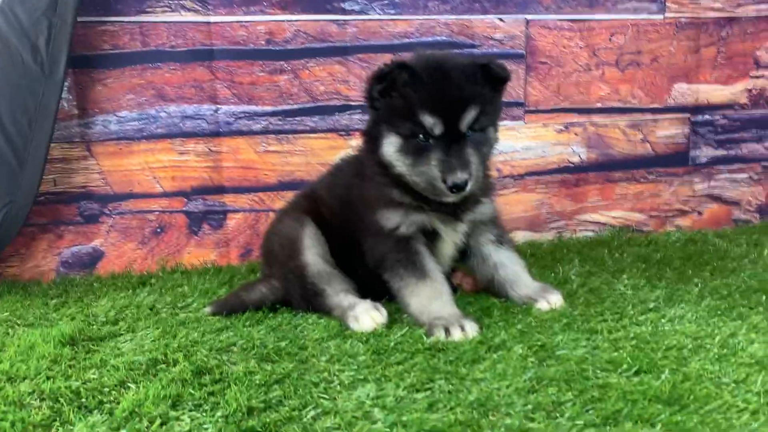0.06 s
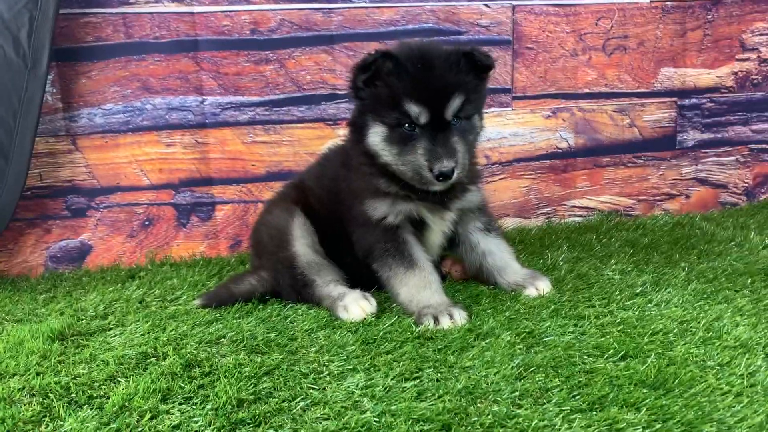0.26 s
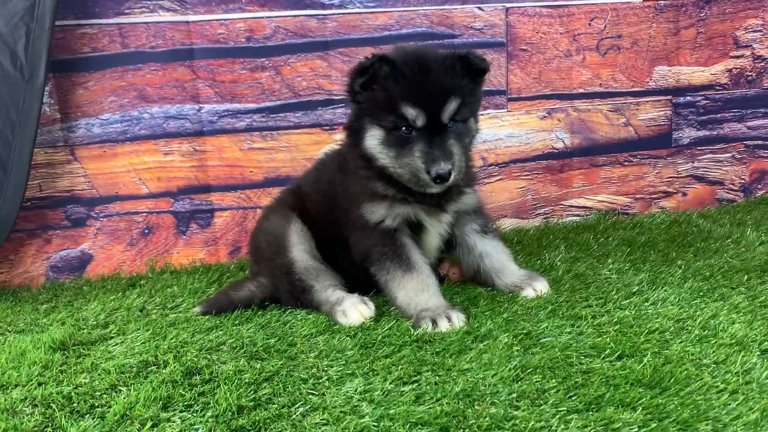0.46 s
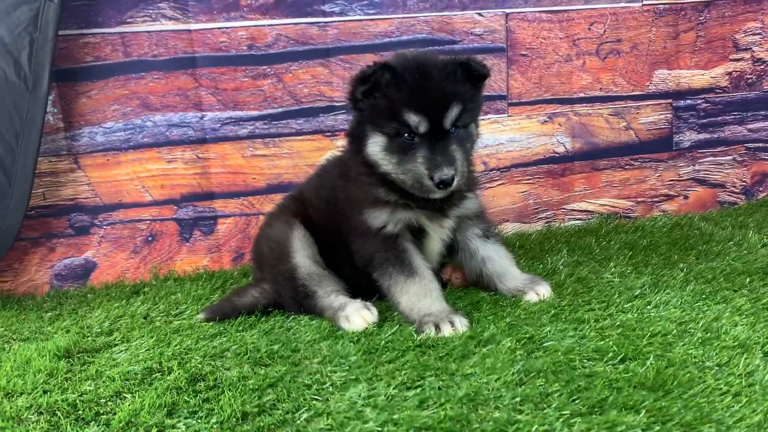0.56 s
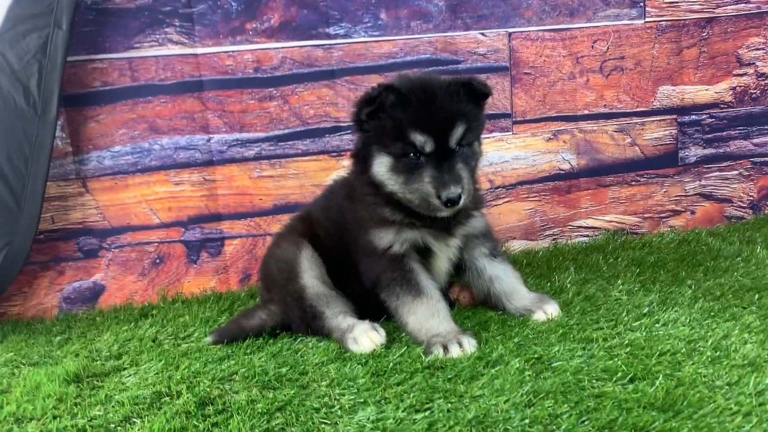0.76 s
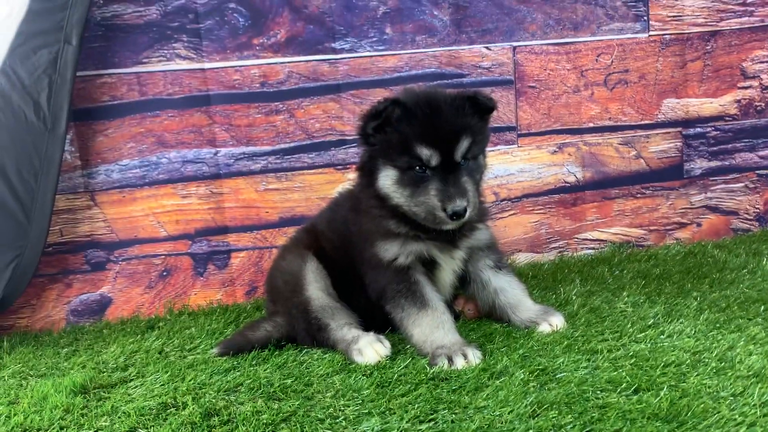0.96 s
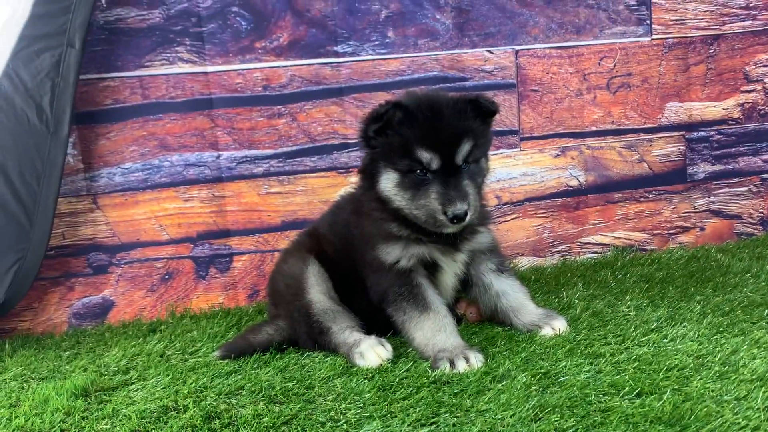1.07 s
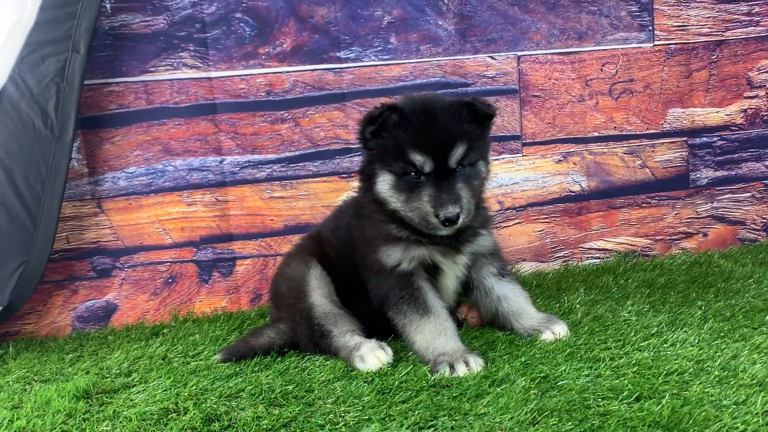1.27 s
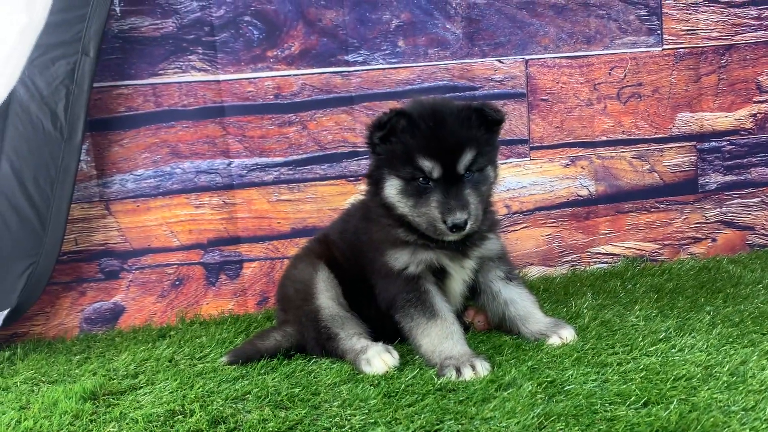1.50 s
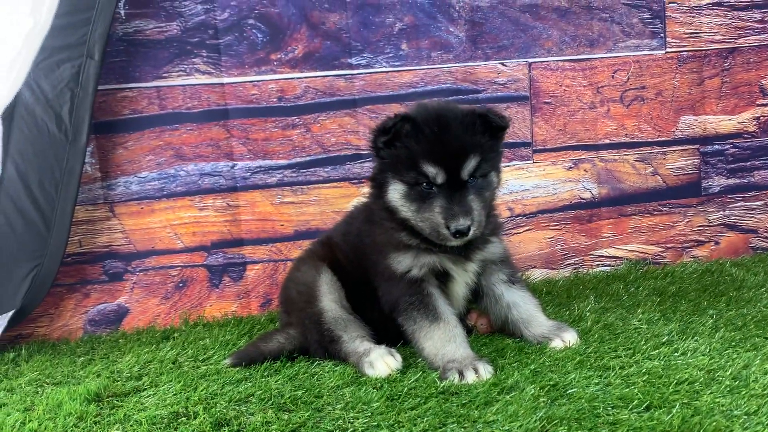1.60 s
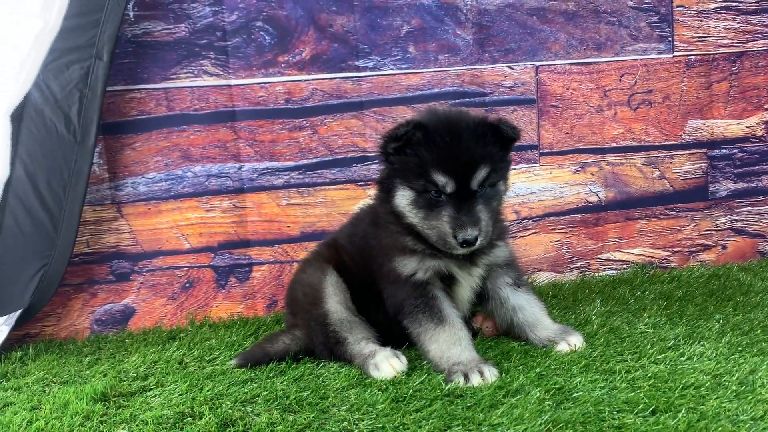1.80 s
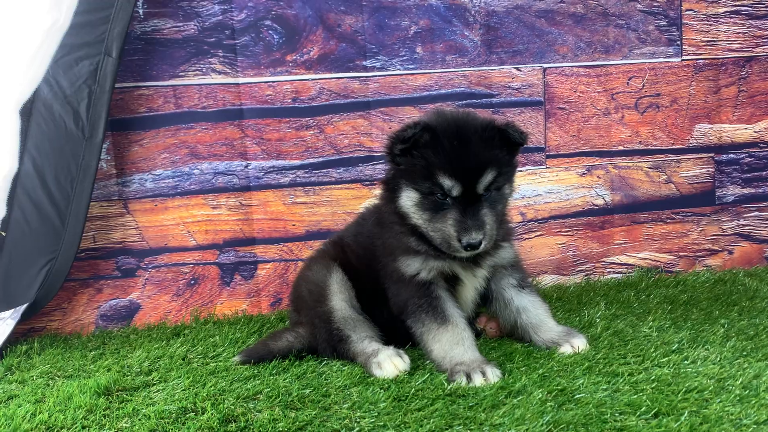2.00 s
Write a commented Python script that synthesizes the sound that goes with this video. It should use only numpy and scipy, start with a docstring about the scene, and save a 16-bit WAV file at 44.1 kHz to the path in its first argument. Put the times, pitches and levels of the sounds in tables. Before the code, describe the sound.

A small puppy lets out three brief, piercing whimpers and one faint lower one within the first second, in a small lightly echoing room; then a soft bump, a faint rustle and low hum, heard close in stereo.

```python
"""Husky puppy whimpers in a small room

Three short, shrill whimpers and one faint low one: harmonics on an arch of pitch, strong near 7 kHz.
Each opens with a puff of coloured noise. Soft bumps are low-passed scuffs over low thuds.
Early reflections and a diffuse tail smear the voice and bumps; brief noise rustles and a low hum stay dry.
"""
import sys
import numpy as np
from scipy import signal
from scipy.fft import rfft, irfft
from scipy.io import wavfile
from scipy.ndimage import uniform_filter1d

SR = 44100
rng = np.random.default_rng(int(sys.argv[2]) if len(sys.argv) > 2 else 0)


def to_wav(sig):
    """Store sig (one row per channel, or 1-D mono) as 16-bit WAV at the path in sys.argv[1].

    Samples outside -1..1 are clipped; the rate is SR.
    """
    pcm = np.clip(np.atleast_2d(sig), -1, 1) * 32767
    pcm = np.round(pcm).astype(np.int16)
    wavfile.write(sys.argv[1], SR, pcm.T)  # frames by channels


N = 90404
T = np.arange(N) / SR

# Whimpers: start_s, top_s, end_s, top_pitch_hz, slack_pitch_hz, overtones_db, fundamental_db,
# hold_s, fade_db_per_s, air_db (relative to the overtones)
WHIMPERS = [(0.208, 0.263, 0.31, 1397, 991.7, -20.5, -29, 0.041, 289.5, -19),
            (0.392, 0.398, .44, 887, 770, -37.5, -40.5, 0.016, 380.5, -27),
            (0.584, 0.624, .686, 1145, 1015, -21, -32.5, 0.006, 298.5, -22.5),
            (0.944, 0.998, 1.068, 1365, 1015, -20.5, -29.5, .034, 311.5, -15.5)]
# Throat and nose resonance: freq_hz, relative_db
THROAT_COLOUR = [(1700, 0.5), (2300, -12.5), (2750, -8.5), (3100, -15), (3500, -11.5), (4300, -10.5),
                 (5500, -7.5), (6300, -0.5), (6900, 2), (7500, -3.5), (8150, -3.5), (9200, -10.5),
                 (11000, -10.5), (12200, -53.5), (13000, -3.5), (14300, -19), (15200, -42.5)]
# Spectrum of the opening puff: freq_hz, relative_db
PUFF_COLOUR = [(120, -6.5), (220, 3.5), (550, -8), (900, 4), (1600, -14.5), (2200, 7), (3000, -17.5),
               (4500, -7.5), (7000, 2.5), (10000, -17.5), (15000, -11)]
# Soft contacts: start_s, scuff_db (before low-pass), thud_db, scuff_decay_s, scuff_cutoff_hz
BUMPS = [(.178, -57.5, -46.5, 0.042, 2370), (0.409, -48, -49, .018, 3010),
         (0.863, -46.5, -46.5, .012, 4530), (1.309, -37, -43, 0.0091, 11040)]
# Spectrum of the scuffs: freq_hz, relative_db
SCUFF_COLOUR = [(150, -8), (280, -2), (420, 7), (580, -6), (850, -2.5), (1100, -18), (1700, -18.5),
                (3500, -19), (7000, -28), (10000, -23), (14000, -34)]
# Spectrum of the thuds: freq_hz, relative_db
THUD_COLOUR = [(50, -13), (110, 3.5), (220, 2.5), (330, -8), (600, -22), (1200, -44.5)]
# Rustles: start_s, length_s, level_db
RUSTLES = [(1.192, 0.087, -64.5), (1.979, .12, -52.5)]
# Spectrum of the rustles: freq_hz, relative_db
RUSTLE_COLOUR = [(240, -9.5), (450, -5.5), (750, -15), (1400, -6), (1900, -4), (2400, -12), (2950, -22.5),
                 (3500, -10.5), (4300, -12), (5200, -21), (6600, -26.5), (8700, -21.5), (11900, -27),
                 (13300, -22), (15000, -46)]
# Reverberation time by band: freq_hz, t60_s
ROOM_T60 = [(200, 1), (1200, 0.25), (3000, 0.31), (7000, 0.29), (10000, 0.29), (14000, .26)]
# Spectrum of the reflected sound: freq_hz, gain_db
ROOM_COLOUR = [(100, -8.5), (400, -5), (1100, 0.5), (2500, 6.5), (4000, 3.5), (7000, 6.5), (14000, -3)]
# Stereo balance: freq_hz, left_minus_right_db
PAN = [(300, -1), (800, -5.5), (1300, 5), (2800, 2), (5000, 0), (8000, -3), (13000, 0.5)]
# Spectrum of the quiet room noise: freq_hz, relative_db
FLOOR_COLOUR = [(20, -36.5), (35, -28.5), (55, 10.5), (80, -11.5), (150, -13), (250, -17.5), (350, -29.5),
                (450, -20), (600, -31.5), (1400, -37), (2700, -48.5), (15000, -66)]

PITCH_RISE_S, PITCH_FALL_S = 0.037, 0.041  # widths of the two sides of the arch
ARCH_POWER = 2.3  # above 2 flattens the top
SAG_HZ_PER_S, SAG_AFTER_S = 2000, 0.025  # extra pitch fall, counted from the top
ATTACK_S, RELEASE_S = 0.0098, 0.0045
SWELL_DB_PER_S = 322.5  # growth towards the hold
JITTER_RATIO, JITTER_RATE_HZ = 0.005, 1100
CATCH_JITTER_RATIO, CATCH_DECAY_S = 0.025, 0.0068  # extra at the start
SLACK_JITTER_RATIO = 0.018  # extra as the pitch leaves the top
SHIMMER_DB, SHIMMER_RATE_HZ = 2.2, 200
OVERTONE_FADE_RATIO = 1.325  # overtone fade rate over that of the fundamental
PUFF_DB, PUFF_DECAY_S = -37.5, 0.02  # level for the loudest whimper, before the envelope
SCUFF_RISE_S = 0.003
THUD_RISE_S, THUD_DECAY_S = 0.027, 0.016
RUSTLE_RISE_S = 0.024
LEFT_LAG_S = 0.00003
EARLY_DB, EARLY_SPAN_S = -3, 0.04  # levels before ROOM_COLOUR
TAIL_DB, TAIL_GAP_S = -8.5, 0.0043
HUM_HZ, HUM_DB, HUM_WAVER_DB = 53, -56, 5.5
FLOOR_DB = -52.5
TOP_HZ = 15300


def undb(db):
    """Decibels to gain."""
    return 10 ** (np.asarray(db) / 20)


def at_hz(points, hz):
    """Interpolate (freq_hz, value) points on a log-frequency axis."""
    p = np.array(points, float)
    return np.interp(np.log(np.maximum(hz, 1)), np.log(p[:, 0]), p[:, 1])


def noise(colour, side=1):
    """Coloured stereo noise of unit level; the side signal vanishes towards the bass."""
    hz = np.arange(N // 2 + 1) * SR / N
    mid, diff = rfft(rng.standard_normal((2, N))) * undb(at_hz(colour, hz))
    diff = diff * side * hz / (hz + 350)
    y = irfft(np.array([mid + diff, mid - diff]), N)
    return y / y.std()


def walk(rate_hz):
    """Smoothed random signal of unit spread."""
    width = max(int(SR / rate_hz), 1)
    y = uniform_filter1d(uniform_filter1d(rng.standard_normal(N), width), width)
    return y / y.std()


def whimper(start, top, end, top_hz, slack_hz, overtones_db, fundamental_db, hold, fade, air_db):
    """Throat-coloured harmonics on one arch of pitch: a rough catch, a swell, a hold and a fade."""
    span = (T > start) & (T < end + RELEASE_S)
    t = T[span]
    attack = np.clip((t - start) / ATTACK_S, 0, 1) ** 2
    release = np.clip((end + RELEASE_S - t) / RELEASE_S, 0, 1)
    before_hold = np.maximum(top - hold / 2 - t, 0)
    after_hold = np.maximum(t - top - hold / 2, 0)
    effort = undb(-SWELL_DB_PER_S * before_hold - fade * after_hold)

    width = np.where(t < top, PITCH_RISE_S, PITCH_FALL_S)
    arch = np.exp(-(np.abs(t - top) / width) ** ARCH_POWER)
    jitter = JITTER_RATIO + CATCH_JITTER_RATIO * np.exp(-(t - start) / CATCH_DECAY_S)
    jitter = jitter + SLACK_JITTER_RATIO * (t > top) * (1 - arch)
    sag = SAG_HZ_PER_S * np.maximum(t - top - SAG_AFTER_S, 0)
    hz = slack_hz + (top_hz - slack_hz) * arch - sag
    hz = hz * (1 + jitter * walk(JITTER_RATE_HZ)[span])
    phase = 2 * np.pi * np.cumsum(hz) / SR

    k = np.arange(2, 17)[:, None]  # overtone numbers
    gains = undb(at_hz(THROAT_COLOUR, k * hz)) * (k * hz < SR / 2)
    gains = gains / np.sqrt((gains ** 2).sum(0).mean() / 2)  # unit RMS sum
    shimmer = undb(SHIMMER_DB * np.array([walk(SHIMMER_RATE_HZ)[span] for _ in k]))
    # breath keeps the throat colour from 4.3 kHz up
    air = noise([(1500, -45), (3200, -25)] + THROAT_COLOUR[5:])[0, span] * undb(air_db)
    overtones = (gains * shimmer * np.sin(k * phase)).sum(0) + air
    extra_fade = np.where(t > top, effort ** (OVERTONE_FADE_RATIO - 1), 1)
    overtones = overtones * undb(overtones_db) * extra_fade
    fundamental = np.sqrt(2) * np.sin(phase) * undb(fundamental_db)
    out = np.zeros(N)
    out[span] = attack * release * effort * (overtones + fundamental)
    return out


def puffs():
    """Escaping air opens each whimper, scaled by its overtone level."""
    loudest_db, envelope = max(row[5] for row in WHIMPERS), 0
    for start, _, _, _, _, db, *_ in WHIMPERS:
        age = np.maximum(T - start, 0)
        shape = np.minimum(age / ATTACK_S, 1) ** 2 * np.exp(-age / PUFF_DECAY_S)
        envelope = envelope + undb(db - loudest_db + PUFF_DB) * shape
    return noise(PUFF_COLOUR)[0] * envelope


def bumps():
    """Each soft contact gives a short scuff, dull or bright, and a slower low thud."""
    scuff, thud, out = noise(SCUFF_COLOUR)[0], noise(THUD_COLOUR)[0], 0
    for start, scuff_db, thud_db, decay, cutoff_hz in BUMPS:
        age = np.maximum(T - start, 0)
        dulled = signal.sosfilt(signal.butter(2, cutoff_hz, fs=SR, output="sos"), scuff)
        scuff_shape = np.minimum(age / SCUFF_RISE_S, 1) * np.exp(-age / decay)
        thud_fall = np.exp(-np.maximum(age - THUD_RISE_S, 0) / THUD_DECAY_S)
        thud_shape = np.minimum(age / THUD_RISE_S, 1) * thud_fall
        out = out + dulled * undb(scuff_db) * scuff_shape + thud * undb(thud_db) * thud_shape
    return out


def direct(size=8):
    """Direct path: one band-limited impulse per ear, the left slightly later."""
    lag = np.array([[LEFT_LAG_S], [0]]) * SR
    return np.sinc(np.arange(N) - size - lag) * (np.arange(N) <= 2 * size + 1)


def early_reflections(count=40):
    """Scattered impulses of random sign, weaker with delay, drawn separately for each ear."""
    early = np.zeros((2, N))
    for ear in early:
        when = (np.arange(count) + rng.random(count)) / count
        index = ((0.001 + when * EARLY_SPAN_S) * SR).astype(int)
        ear[index] = rng.choice([-1, 1], count) * np.exp(-1.5 * when)
    return early


def diffuse_tail():
    """Noise split into bands, each decaying 60 dB in its own T60."""
    hz = np.arange(N // 2 + 1) * SR / N
    white = rfft(rng.standard_normal((2, N)))
    tail = 0
    for i, (_, t60) in enumerate(ROOM_T60):
        share = at_hz([(f, i == j) for j, (f, _) in enumerate(ROOM_T60)], hz)
        tail = tail + irfft(white * share, N) * np.exp(-np.log(1000) * T / t60)
    return tail * np.clip(T / TAIL_GAP_S - 1, 0, 1)


def unit_energy(response):
    """Scale each ear's response to unit energy."""
    return response / np.sqrt((response ** 2).sum(1, keepdims=True))


def room(x):
    """Convolve with direct path, early reflections and tail, then tilt the stereo balance."""
    hz = np.arange(N // 2 + 1) * SR / N
    tail = unit_energy(diffuse_tail()) * undb(TAIL_DB)
    early = unit_energy(early_reflections()) * undb(EARLY_DB)
    reflected = irfft(rfft(tail + early) * undb(at_hz(ROOM_COLOUR, hz)), N)
    heard = signal.fftconvolve(x[None], reflected + direct(), axes=1)[:, :N]
    balance_db = np.array([[1], [-1]]) * at_hz(PAN, hz) / 2
    return irfft(rfft(heard) * undb(balance_db), N)


def rustle():
    """Coloured noise swells and sinks in brief rustles."""
    envelope = 0
    for start, length, db in RUSTLES:
        nearest_edge = np.minimum(T - start, start + length - T)
        envelope = envelope + undb(db) * np.clip(nearest_edge / RUSTLE_RISE_S, 0, 1)
    return noise(RUSTLE_COLOUR) * envelope


def background():
    """Low sine hum, wavering in pitch and level, over quiet room noise."""
    phase = 2 * np.pi * np.cumsum(HUM_HZ * (1 + 0.05 * walk(35))) / SR
    hum = np.sqrt(2) * np.sin(phase) * undb(HUM_DB + HUM_WAVER_DB * walk(3.1))
    return hum + noise(FLOOR_COLOUR, side=0.98) * undb(FLOOR_DB)


def scene():
    """Puppy and bumps in the room, plus dry rustles and background."""
    voice = sum(whimper(*row) for row in WHIMPERS) + puffs()
    return room(voice + bumps()) + rustle() + background()


def record(dry):
    """The recorder's steep low-pass cuts the top."""
    return signal.sosfilt(signal.ellip(8, 0.2, 70, TOP_HZ, fs=SR, output="sos"), dry)


dry = scene()
out = record(dry)
to_wav(out)
```